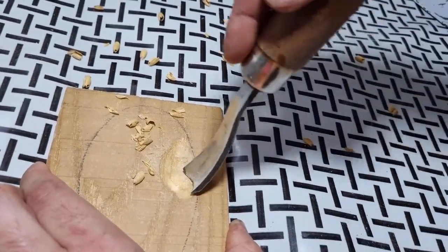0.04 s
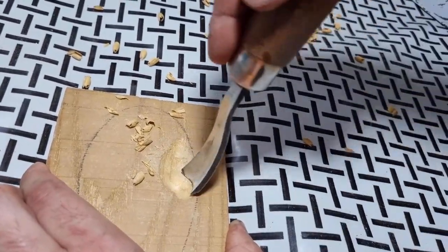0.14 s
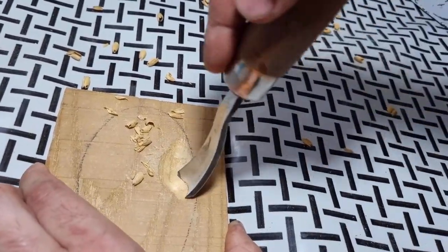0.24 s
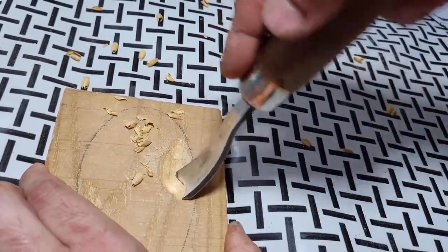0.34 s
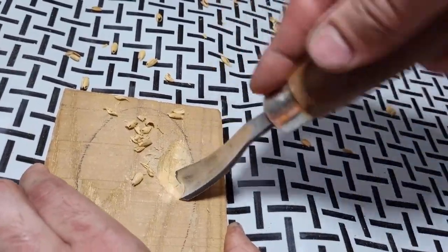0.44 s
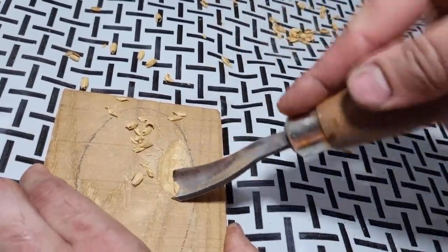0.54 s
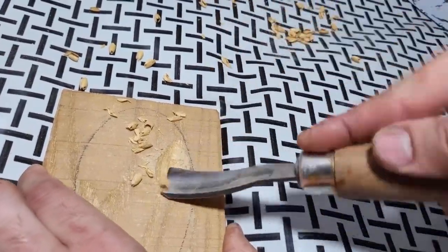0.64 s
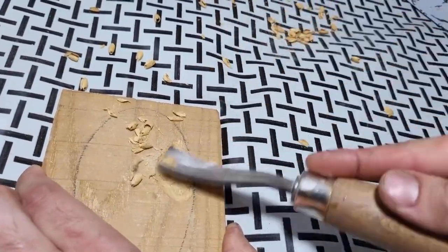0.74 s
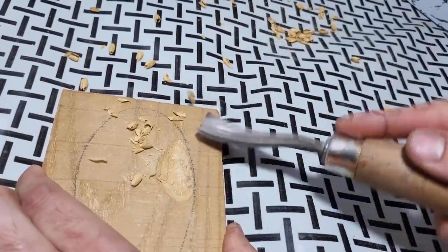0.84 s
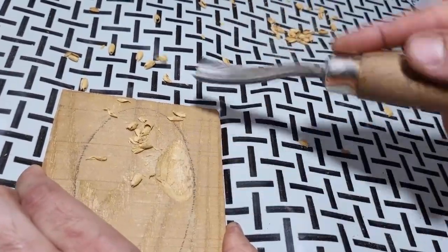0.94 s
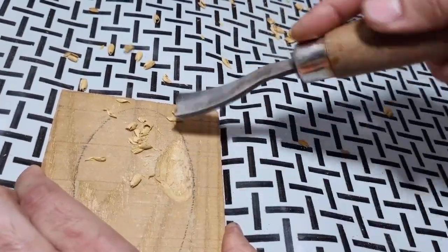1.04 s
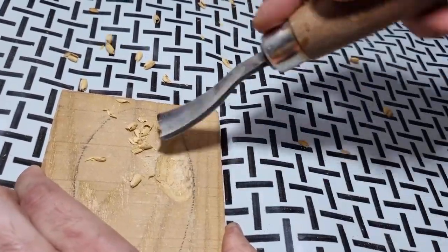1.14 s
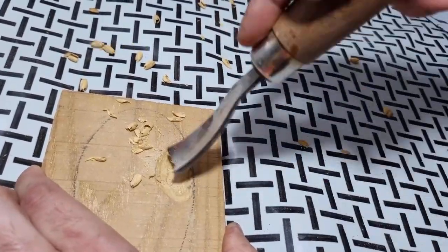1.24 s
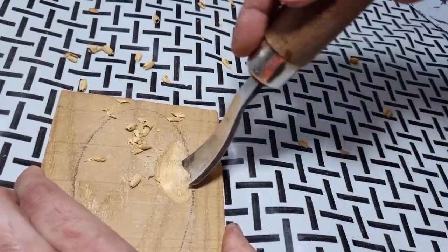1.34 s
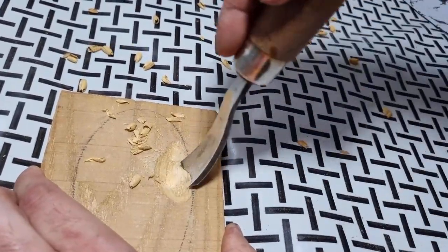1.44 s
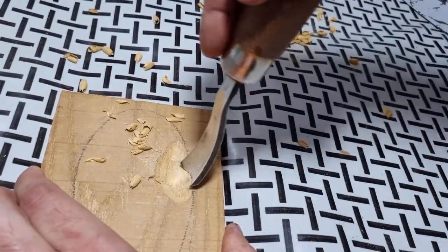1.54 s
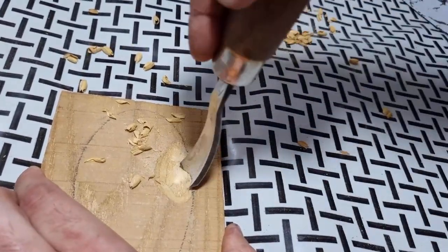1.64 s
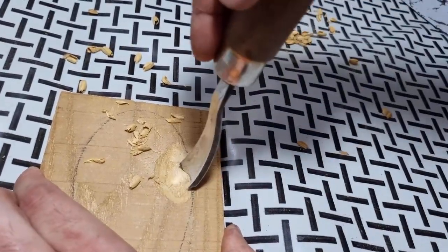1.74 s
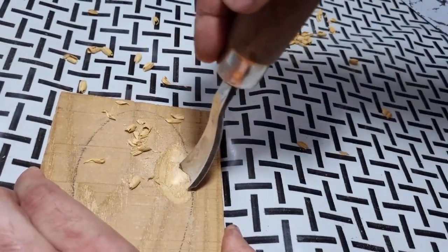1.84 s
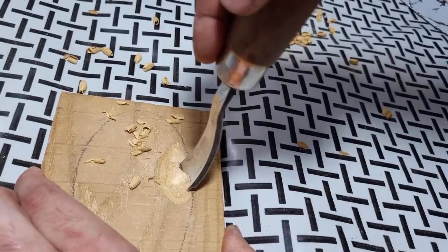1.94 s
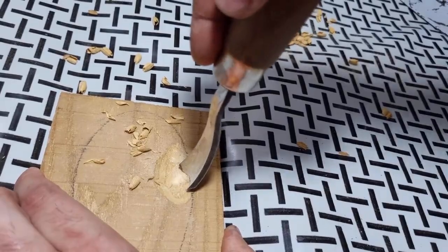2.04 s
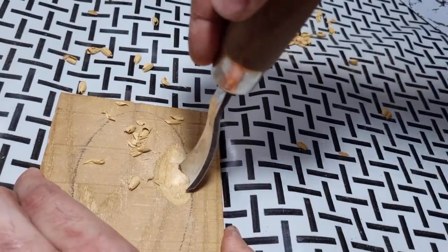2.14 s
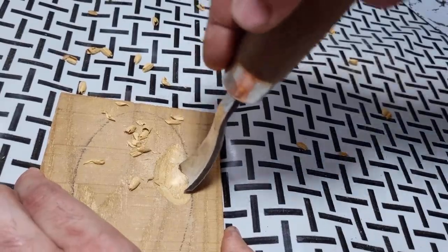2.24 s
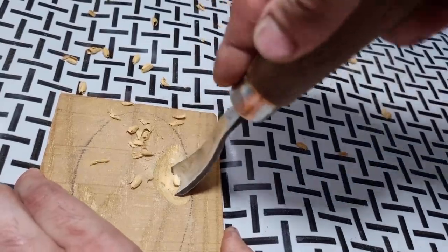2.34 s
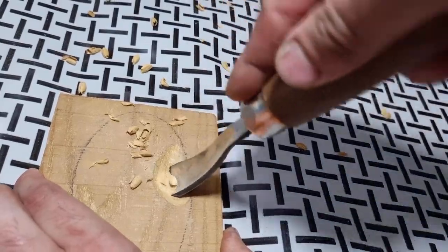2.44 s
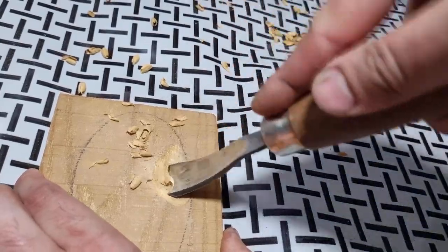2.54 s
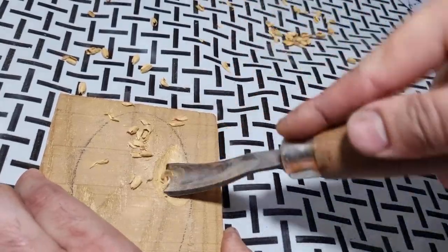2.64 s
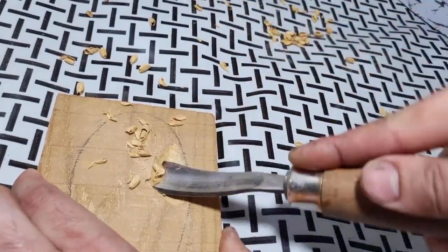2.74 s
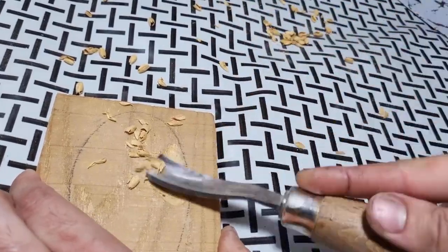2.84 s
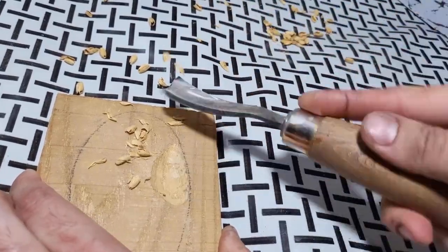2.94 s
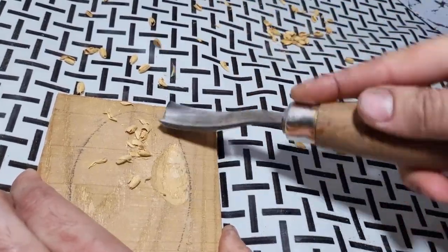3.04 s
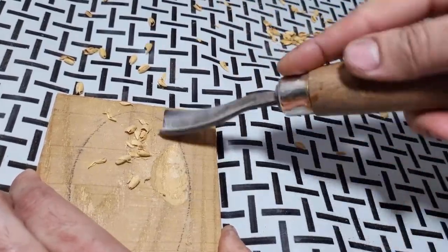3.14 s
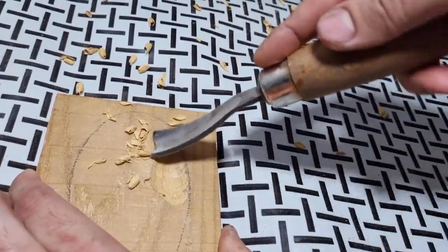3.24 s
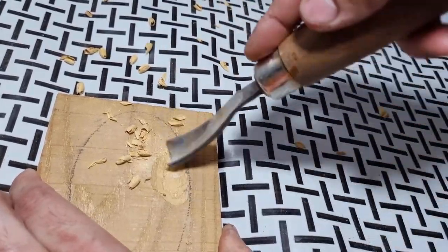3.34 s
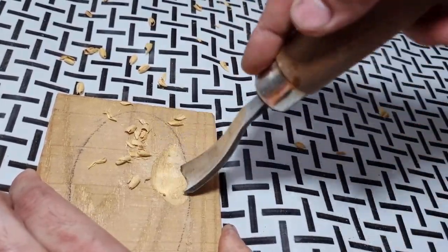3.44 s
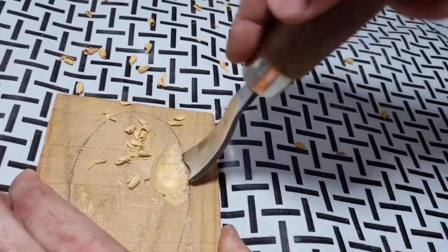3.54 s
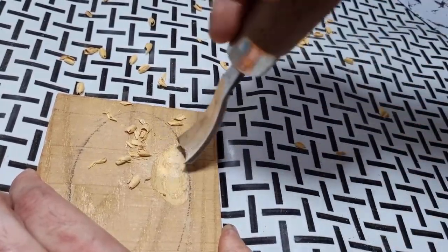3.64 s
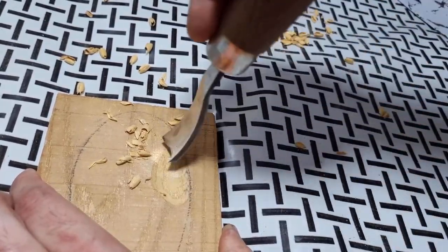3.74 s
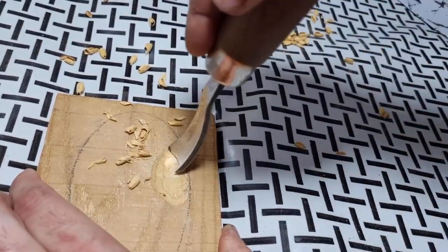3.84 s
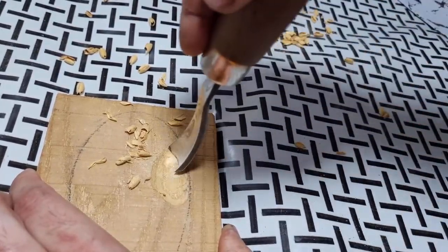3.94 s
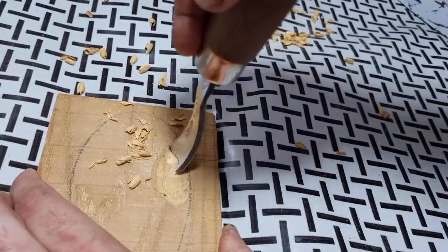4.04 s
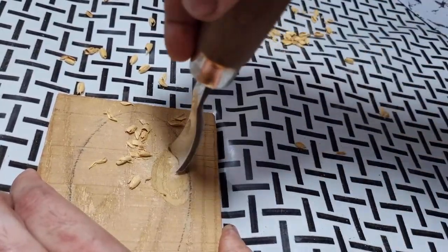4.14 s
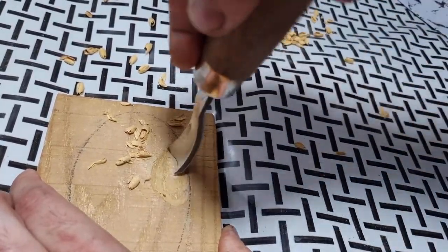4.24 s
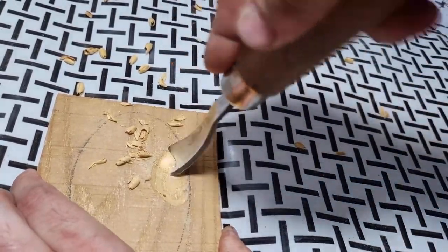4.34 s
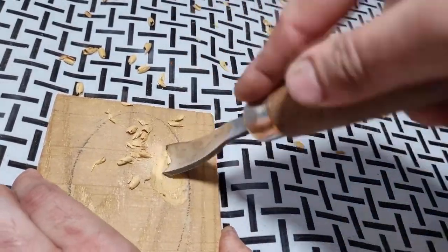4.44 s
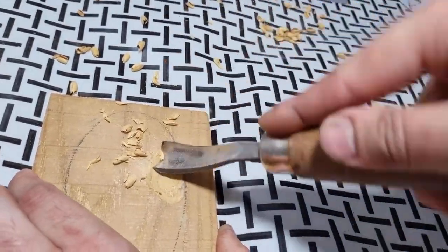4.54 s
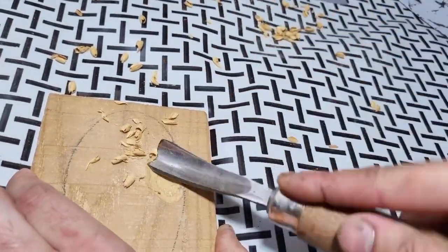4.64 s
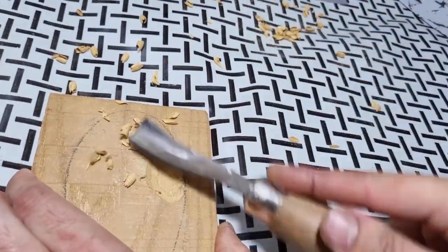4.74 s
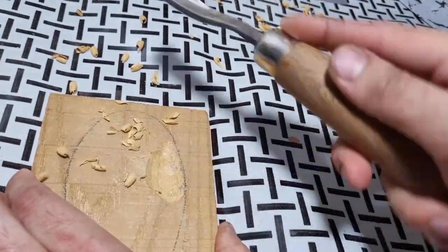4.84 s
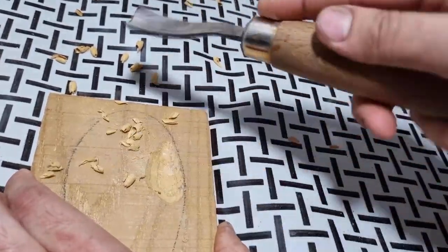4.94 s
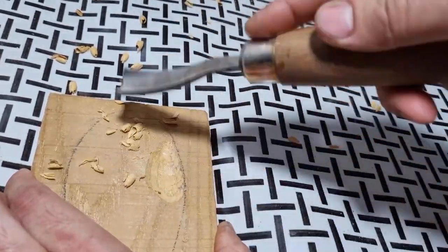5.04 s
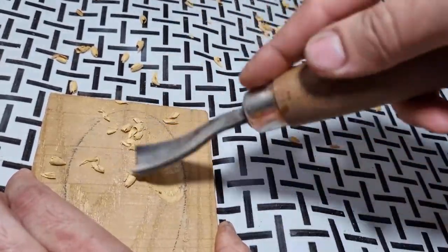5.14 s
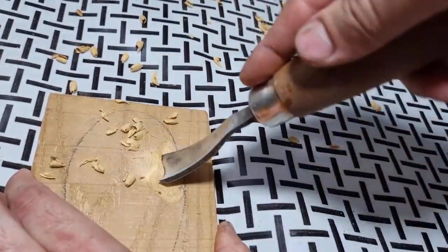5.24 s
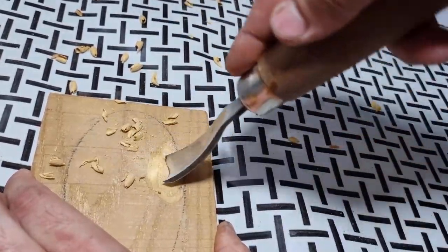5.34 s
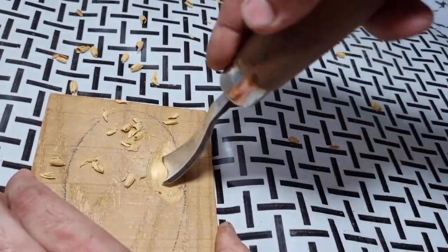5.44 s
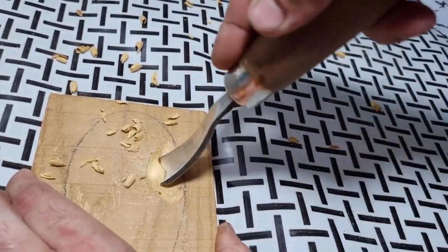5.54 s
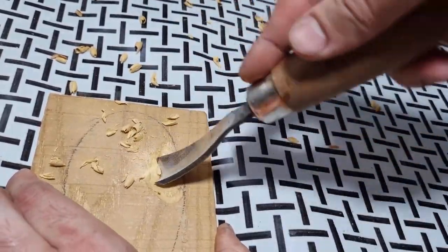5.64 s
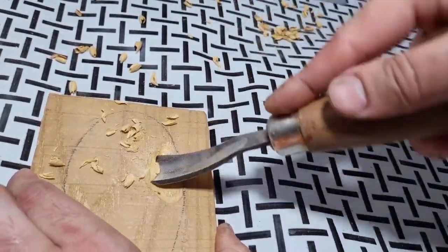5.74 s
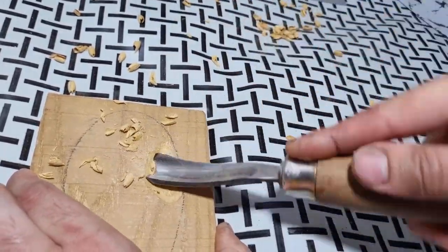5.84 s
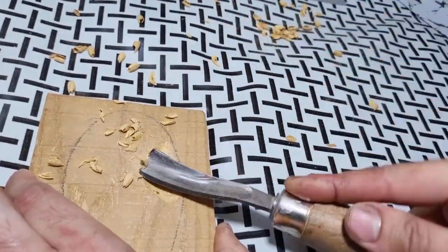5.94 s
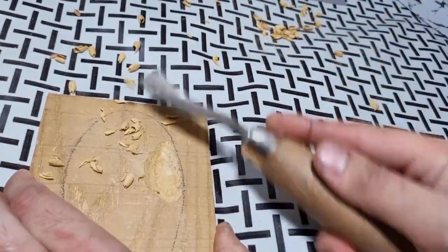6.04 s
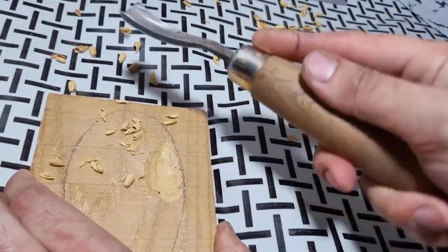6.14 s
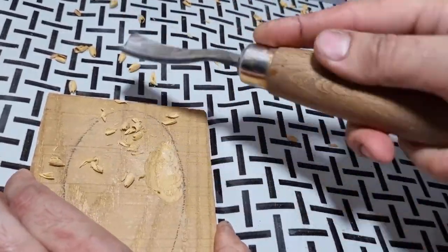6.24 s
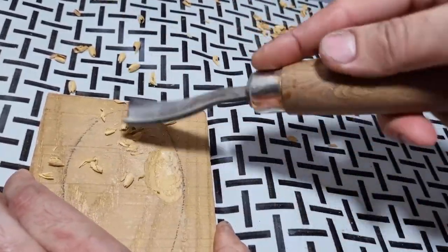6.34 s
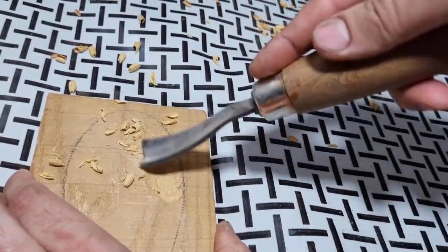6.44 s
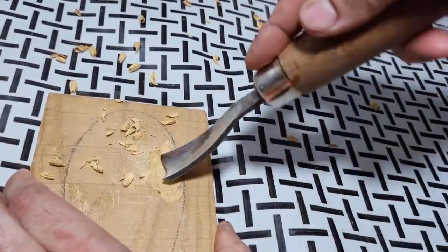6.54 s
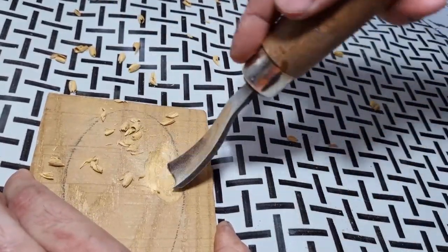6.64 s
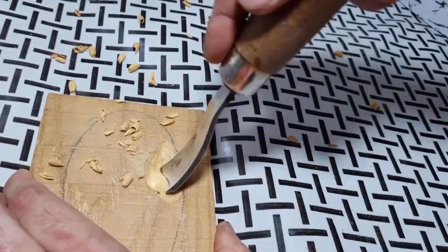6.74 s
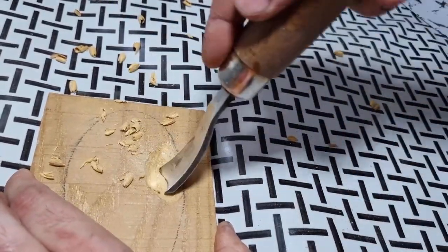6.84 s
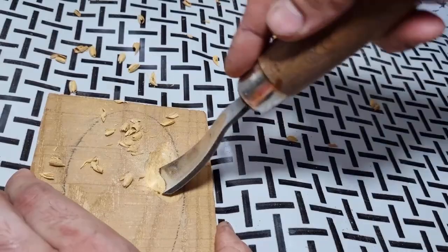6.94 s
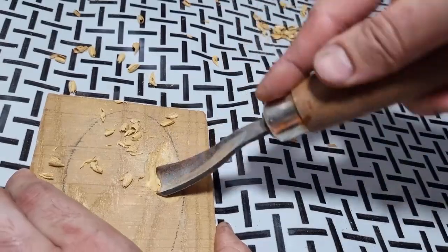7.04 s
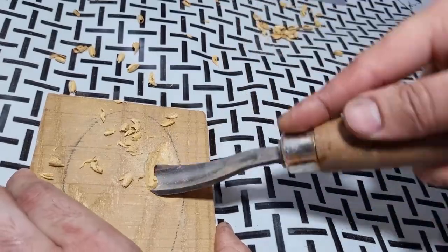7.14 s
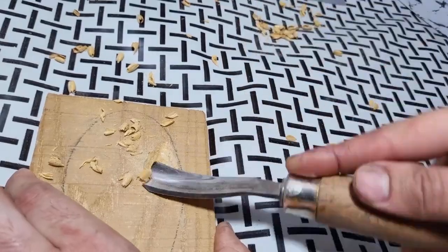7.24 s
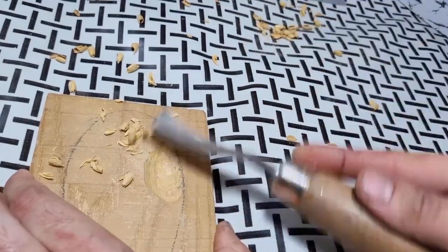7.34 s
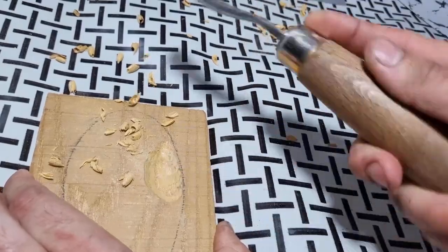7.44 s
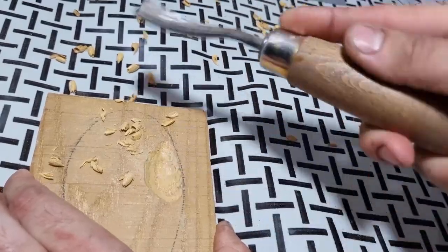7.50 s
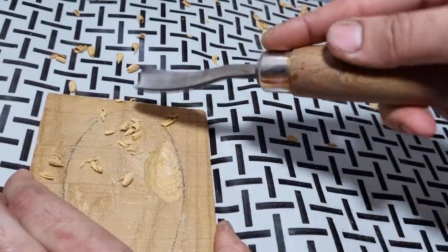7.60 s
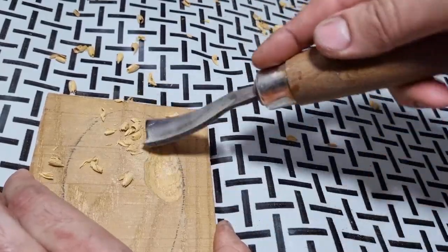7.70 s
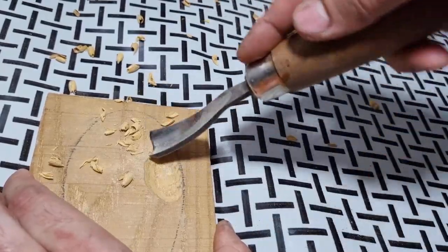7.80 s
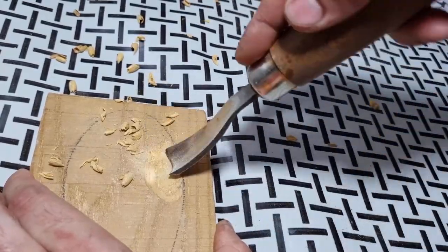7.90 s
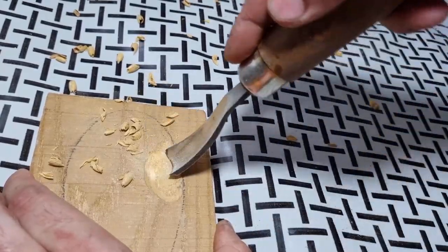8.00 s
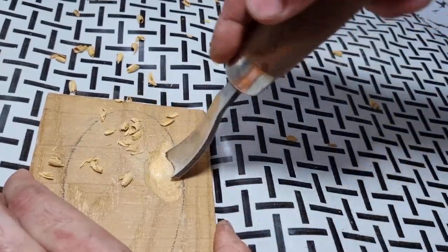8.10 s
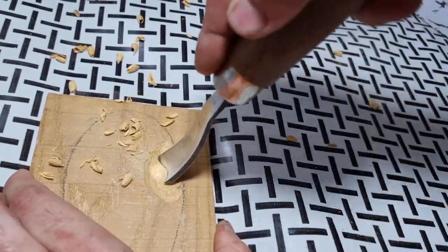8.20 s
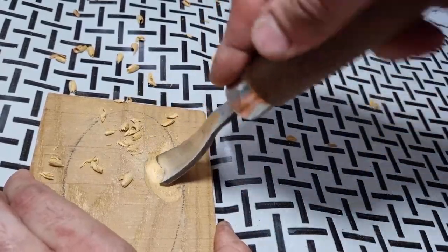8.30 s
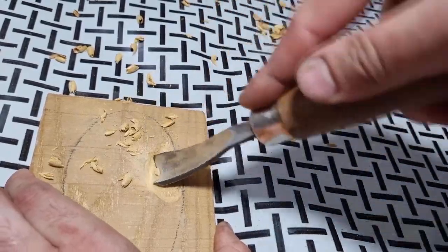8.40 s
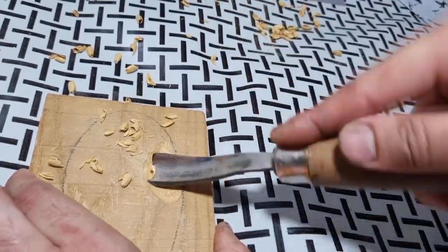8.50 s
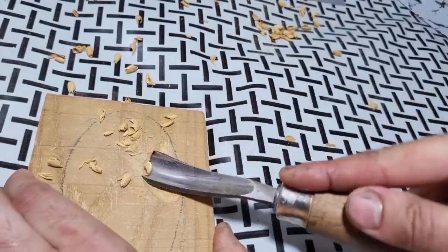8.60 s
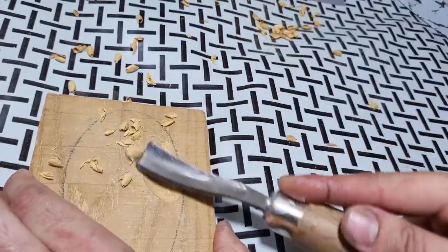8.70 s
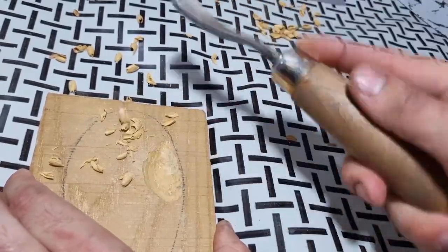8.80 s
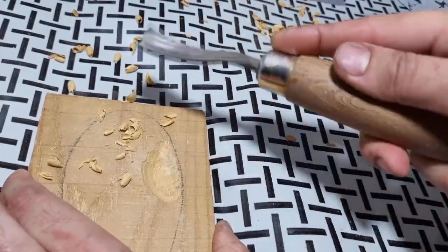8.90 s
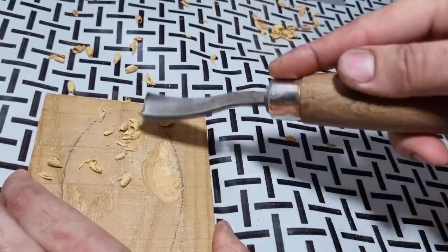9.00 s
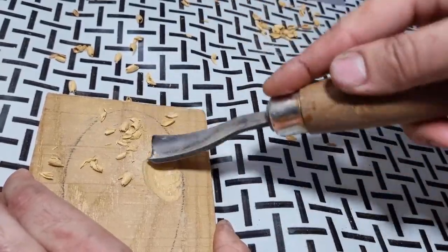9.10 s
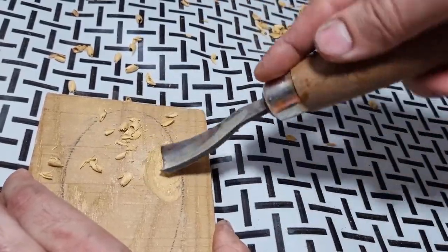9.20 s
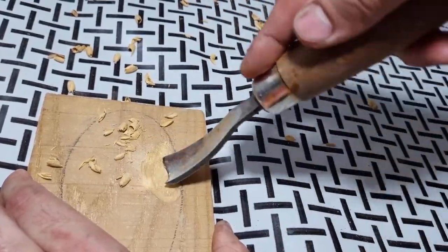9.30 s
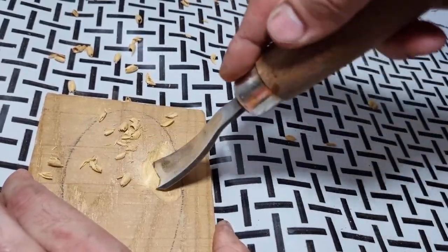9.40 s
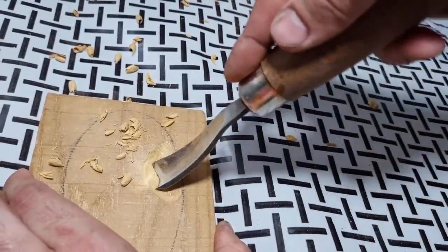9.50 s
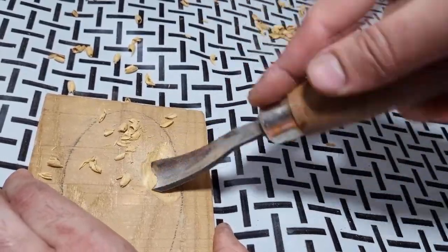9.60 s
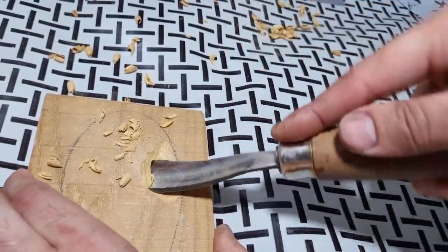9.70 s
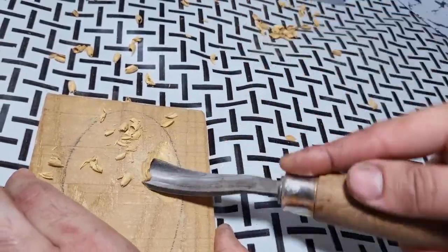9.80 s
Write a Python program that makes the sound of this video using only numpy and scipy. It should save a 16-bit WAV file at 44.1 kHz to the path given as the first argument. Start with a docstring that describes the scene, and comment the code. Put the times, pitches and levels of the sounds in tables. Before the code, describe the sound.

A hand gouge cuts a small wooden board in seven short, crackling strokes with light taps between, over a low hum.

```python
"""Close on a hand gouge hollowing a small board on a cloth-covered table, indoors, with a stereo pair.
From the start a low hum wavers under faint microphone hiss. The tail of a tap fades, then the edge bites:
fibres tear and snap in bursts, board and blade ring briefly, and the room answers. The chip lets go,
leaving the rustle of resting hands. Six more strokes follow, the edge tapped down ahead of each; the
last is still cutting as the sound ends, near ten seconds."""
import sys
import numpy as np
from scipy import signal
from scipy.io import wavfile

SR = 44100
rng = np.random.default_rng(int(sys.argv[2]) if len(sys.argv) > 2 else 0)


def dump_mix(stems):
    """Bounce the given channels to the path in sys.argv[1] as a 16-bit WAV at rate SR."""
    frames = np.atleast_2d(stems).T  # one column per channel
    limited = np.clip(frames, -1, 1)  # hard clip at full scale
    pcm = np.round(limited * 32767).astype(np.int16)
    wavfile.write(sys.argv[1], SR, pcm)


N = 434826

# Rumble and microphone hiss. Each row: frequency in Hz, relative spectral density in dB.
NOISE_SPECTRUM = [(25, -28), (40, -9), (52, -28.5), (95, -11.5), (118, -16.5), (200, -20.5), (270, -35.5),
                  (347, -31), (400, -44), (1000, -59), (2050, -49.5), (3000, -57), (6000, -47),
                  (9220, -59.5), (14700, -44.5), (16000, -55)]
# How alike that noise is at the two microphones. Each row: frequency in Hz, likeness from 0 to 1.
NOISE_LIKENESS = [(30, .86), (60, .9), (130, 1), (290, 0.64), (640, 0), (1400, 0), (15000, 0.3)]
# The low hum swells and fades. Each row: time in seconds, level in dB.
HUM_SWELLS = [(0.0, -49), (0.08, -43), (1.04, -44), (1.1, -39), (1.62, -48.5), (2.47, -37), (2.55, -45),
              (3.73, -52.5), (4.09, -39.5), (4.15, -49), (4.75, -48.5), (6.59, -44.5), (6.73, -52),
              (7.85, -42), (8.18, -48.5), (8.27, -38), (9.69, -51), (9.86, -38)]
# Narrow bands of hiss. Each row: centre in Hz, level in dB, t60 in seconds.
HISS_BANDS = [(2080, -73.5, 0.018), (6400, -64.5, .008)]
# The room around the table. Each row: low and high band edge in Hz, t60 in seconds, level in dB.
ROOM_BANDS = [(149, 607, 0.73, -11.5), (670, 2300, 0.38, -11), (1930, 6100, 0.36, -14),
              (4870, 13000, 0.22, -7.5)]

# Modes of the five ringing parts. Each row: frequency in Hz, gain in dB when tapped and when cutting,
# t60 in seconds, left microphone over right in dB, left lead in samples.
BOARD_BENDING = [(289.4, 0.5, -16, .025, 3, 2), (448, -4.5, -3.5, 0.017, -0.5, 3),
                 (605, -1.5, 1.5, 0.015, 0.5, 4), (700.5, 1, 2.5, 0.017, 0, 4),
                 (801, 3, -4, 0.018, -0.5, 4)]
BOARD_TWISTING = [(997, 1, -5, 0.012, 2, 4), (1173, -0.5, -3, 0.021, 1.8, 4), (1377, -8, -6.5, 0.025, 2, 4),
                  (1590, -12, -1, 0.024, 0.91, 7.5), (1772, -3, -1, 0.0095, 2.7, 7.4)]
BLADE_RING = [(2352, -16, -17, 0.034, 1.7, 13), (2531, 5, 0, 0.02, 2.1, 14.4),
              (2620, 2, -2, 0.024, 6.7, 15.42), (2760, -10, -8, 0.016, 6.3, 16.8),
              (3215, -26, -14.5, .015, 0.61, 14)]
CLINK_MODES = [(3540, -2, 5.5, 0.0023, 0.74, 2.5), (3900, -0.5, -7, 0.012, 0, 2),
               (4210, -7, -2, 0.0068, -1, -0.5), (4720, -3, -4.5, 0.011, -1.4, -5)]
CRACK_MODES = [(5285, 1, -1.5, .004, 2.5, 3), (5870, -1.5, -8, 0.0088, -2.2, 3.2),
               (6700, -18, -6, 0.0018, -1.5, 1), (7400, -7.5, -2.5, .004, -2, 4),
               (8340, -4, -7, 0.0026, -4.9, 7.5), (9050, -17, -6, 0.0023, -3.5, 2),
               (10400, -20.5, -5.5, 0.0023, -2, 5), (12430, -12, -6.5, 0.0025, 0.5, 3.5),
               (14700, -17, -5, .002, 0.5, 0.46)]

# The edge is set down. Each row: start in seconds, then bending, twisting, blade, clink and crack in dB.
EDGE_TAPS = [(0.8952, -20.5, -16, -29.5, -44.5, -45), (1.3965, -23, -9.5, -13.5, -12.5, -30.5),
             (3.2672, -27, -51, -65, -72, -51.5), (3.4594, -24, -14, -21, -21.5, -35),
             (3.9497, -18, -24.5, -34.5, -34, -40), (5.2636, -13.5, -7, -9, -11.5, -19.5),
             (5.3399, -18, -7.5, -4.5, -10, -32.5), (6.5573, -11, -6.5, -14.5, -22, -31.5),
             (6.6247, -20.5, -7.5, -6, -6, -20), (7.8519, -19.5, -44, -56, -64, -50),
             (7.9745, -18, -9, -16.5, -15.5, -27), (9.0812, -59, -39.5, -50, -45.5, -52),
             (9.1971, -15.5, -13, -35.5, -30.5, -33.5), (9.3038, -19, -5, -13.5, -12, -22.5)]
# The edge creeps in, then cuts; one list a stroke. Each row: time in seconds, push in dB, hiss in dB.
GOUGE_STROKES = [
    [(.2, -77, -67), (.29, -49.5, -60), (.53, -68, -54), (.55, -34, -52), (.65, -27.5, -41),
     (.742, -33.5, -39), (.79, -29, -40.5)],
    [(2.1, -74, -76.5), (2.35, -49, -62.5), (2.4, -35, -50), (2.47, -47, -56.5), (2.567, -36, -50),
     (2.63, -38, -47.5), (2.788, -35, -48.5), (2.844, -36, -50.5), (2.9, -34.5, -47.5), (2.955, -48, -50.5)],
    [(4.1, -68, -70), (4.3, -61.5, -56), (4.45, -42, -61), (4.503, -38, -45), (4.57, -40.5, -45),
     (4.661, -37.5, -44.5), (4.714, -33, -49.5), (4.767, -37, -33.5), (4.82, -41.5, -45.5)],
    [(5.5, -73, -69), (5.65, -46.5, -61), (5.71, -42, -52), (5.823, -46, -52), (5.879, -35.5, -47),
     (5.936, -39, -46.5), (5.992, -30, -39.5), (6.049, -48, -49), (6.105, -29.5, -63)],
    [(6.85, -56, -64), (7.06, -53, -68), (7.085, -28.5, -48.5), (7.198, -31.5, -49), (7.255, -25, -45),
     (7.312, -37, -52), (7.368, -35.5, -48.5), (7.425, -42, -52.5)],
    [(8.2, -65, -59.5), (8.3, -44, -71), (8.37, -55, -64), (8.41, -34, -51), (8.466, -28.5, -53),
     (8.55, -37, -44.5), (8.65, -37.5, -45.5), (8.744, -31.5, -36.5), (8.8, -42.5, -47.5)],
    [(9.45, -54, -61), (9.58, -53, -67), (9.65, -36, -57), (9.72, -47, -48), (9.78, -34, -46),
     (9.82, -35, -43), (9.86, -26, -45)],
]
# A faint tail dies away after a tap. Each row: start in seconds, then push, blade ring and hiss in dB.
TAP_TAILS = [(0.0, -43, -46.5, -56), (3.46, -45.5, -62, -63), (5.27, -34, -35, -55.5),
             (6.56, -45, -41, -67.5), (7.9, -46, -70, -62), (9.2, -62, -54, -64)]
# How fast a tail dies. One row: push, blade ring and hiss in dB per second.
TAIL_DECAY = [113.5, 77.5, 52]
# Loud fibres breaking. Each row: start in seconds, then bending, blade ring and crack in dB.
FIBRE_SNAPS = [(0.2532, -33, -43, -53), (0.305, -16.5, -19.5, -30), (0.3775, -11.5, -16.5, -27.5),
               (0.4405, -10, -12.5, -26), (0.4873, -11, -12.5, -25), (0.5436, -1, -16, -23.5),
               (0.5629, -9, -16, -20), (0.5705, -9.5, -26, -25), (0.5832, -11, -17, -24),
               (0.5956, -32, -24, -34), (0.6236, -7, -18, -25), (0.6531, -7.5, -19, -26),
               (0.6715, -11.5, -16.5, -24), (0.6945, -10, -22, -24), (0.7156, -8, -23, -37),
               (0.7235, -9.5, -17, -41), (0.7442, -9, -10, -34), (0.7512, -14, -27, -37),
               (0.7631, -13, -15, -39), (0.7741, -14, -11, -24.5), (2.3134, -27.5, -39, -42),
               (2.3439, -33, -56, -51), (2.3635, -12, -30, -31), (2.368, -10, -15, -23),
               (2.3737, -4, -4.5, -19), (2.3874, -17, -38, -39), (2.5079, -34, -29, -42),
               (2.5417, -4.5, -13.5, -24.5), (2.5722, -10, -15, -22), (2.6224, -17, -24, -27),
               (2.633, -19, -23.5, -25), (2.659, -13, -21, -28), (2.6734, -19, -13.5, -27),
               (2.697, -9.5, -23, -28.5), (2.711, -24, -25, -25), (2.7291, -29, -33, -34),
               (2.7455, -36, -26, -31), (2.7817, -15, -29, -33), (2.7896, -15, -27, -42),
               (2.799, -17, -26, -42), (2.8904, -22, -24, -55), (2.9497, -25, -46, -39),
               (3.4268, -23.5, -65, -56), (3.443, -20, -46, -47.5), (4.3926, -22, -31.5, -42.5),
               (4.4207, -14.5, -23.5, -29.5), (4.4596, -1.5, -18, -26), (4.4772, -2, -29, -21.5),
               (4.4946, -22, -16, -33), (4.5089, -42, -24, -26), (4.5299, -21, -27, -48),
               (4.544, -29, -36, -25.5), (4.5724, -26, -24, -28), (4.7021, -23, -21, -28),
               (4.7533, -22, -43, -21.5), (4.7644, -14, -13.5, -32), (4.7876, -18, -29, -25),
               (5.5172, -23, -37, -59), (5.5569, -7.5, -21.5, -32.5), (5.6092, -3.5, -23.5, -35),
               (5.677, -6.5, -16.5, -40), (5.7387, -29, -22.5, -35), (5.798, -18.5, -30, -31),
               (5.8138, -16, -13, -21.5), (5.8546, -28, -24, -24), (5.8735, -30, -28, -29),
               (5.8927, -30, -23, -27), (5.9514, -32, -24, -33), (5.9922, -16, -29, -24),
               (6.0172, -21, -19, -27), (6.0302, -20.5, -20.5, -22), (6.0949, -23.5, -30, -36.5),
               (6.8241, -15.5, -40.5, -55.5), (6.9848, -32.5, -45, -61), (7.0372, -32, -36, -55),
               (7.0554, -27.5, -41, -49), (7.0741, -21, -24, -43), (7.0927, -24, -15, -39),
               (7.1165, -18, -23, -35), (7.1429, -27, -30, -44), (7.1735, -18, -21, -38),
               (7.1877, -6.5, -17, -29), (7.2044, -23, -22, -33), (7.2295, -20, -28, -34),
               (7.2417, -16.5, -35, -36), (7.2595, -13.5, -15, -33), (7.3351, -26, -27, -48),
               (7.9449, -26.5, -51.5, -48), (8.2701, -10, -28.5, -38.5), (8.3168, -28, -38, -47),
               (8.3518, -23.5, -33, -44), (8.3892, -14.5, -20, -43), (8.4105, -5, -11, -31.5),
               (8.4146, -3, -7.5, -26), (8.444, -8.5, -12, -33), (8.4543, -16, -8.5, -31),
               (8.4705, -22, -23, -31), (8.4876, -13, -19, -31), (8.4986, -6, -10, -29),
               (8.5125, -27, -20, -25), (8.5556, -27, -23.5, -33), (8.5759, -27, -16.5, -30),
               (8.5829, -13, -16, -20), (8.6041, -13, -13.5, -23), (8.7091, -23, -23, -24),
               (8.7335, -21, -24, -28), (8.7429, -28, -33, -33), (8.7602, -19.5, -31.5, -40.5),
               (9.2917, -13.5, -36.5, -40), (9.4846, -18, -30, -41), (9.5691, -24.5, -37, -50),
               (9.6698, -20.5, -28, -36.5), (9.7002, -14.5, -18, -28), (9.7267, -18, -26.5, -29),
               (9.7711, -17.5, -26.5, -29.5), (9.8236, -15.5, -30, -31), (9.8419, -11, -18.5, -30),
               (9.8535, -12, -28, -39)]

BACKGROUND_DB, HUM_HZ, HUM_WANDER_HZ = -48, 72.3, 3.5
EXIT_S, EXIT_DB = 0.016, [-63, -64]  # the chip lets go: push and hiss drop at once
SETTLE_S, REST_DB = 0.067, [-75, -71.5]  # then fade to the rustle of the resting hands
SMALL_SNAP_DB, SMALL_SPREAD_DB = [8, 8.5, 5.5], 4  # over the cut's push, blade ring and hiss
GRIP_DB, CUTOFF_HZ = 1.4, 16650


def from_db(db):
    """Decibels to gain."""
    return 10 ** (np.asarray(db) / 20)


def rms_one(x):
    """Scale to rms 1."""
    return x / np.sqrt(np.mean(x ** 2) + 1e-20)


def butter(x, hz, kind):
    """Gentle low-cut or band filter."""
    return signal.sosfilt(signal.butter(2, hz, kind, fs=SR, output="sos"), x)


def in_time(rows):
    """Columns of a curve table, one value per sample."""
    times, *columns = np.transpose(rows)
    return [np.interp(np.arange(N) / SR, times, column) for column in columns]


def at_hz(points, hz):
    """Read a table on a log-frequency axis."""
    freqs, values = np.transpose(points)
    return np.interp(np.log(hz), np.log(freqs), values)


def drift(rate_hz):
    """Slow random wander with spread 1."""
    r = np.exp(-40 * np.pi * rate_hz / SR)
    slow = signal.lfilter([1], [1, -2 * r, r * r], rng.standard_normal(N // 20 + 2002))[2000:]
    return np.interp(np.arange(N) / 20, np.arange(len(slow)), rms_one(slow))


def ring(clicks, hz, t60):
    """One damped mode: a unit click sets a sine of height 1 ringing."""
    r, w = from_db(-60 / (t60 * SR)), 2 * np.pi * hz / SR
    return signal.lfilter([0, np.sin(w)], [1, -2 * r * np.cos(w), r * r], clicks + 1e-18)


def background():
    """Rumble and hiss in third octaves: the microphones agree in the bass, hardly in the treble."""
    out, edges = 0, 24 * 2 ** np.arange(0, 9.5, 1 / 3)
    white = rng.standard_normal((2, 2, N))
    for k, (low, high) in enumerate(zip(edges, edges[1:])):
        mid, side = butter(white[k % 2], [low, high], "band")
        hz = np.sqrt(low * high)
        alike = at_hz(NOISE_LIKENESS, hz)
        pair = np.sqrt(1 + alike) * mid + np.sqrt(1 - alike) * side * [[1], [-1]]
        out = out + from_db(at_hz(NOISE_SPECTRUM, hz)) * pair
    return from_db(BACKGROUND_DB) * rms_one(out)


def hum():
    """A low tone a little to the left, wandering in pitch and level, and two faint bands of hiss."""
    pitch_hz = HUM_HZ + HUM_WANDER_HZ * drift(5)
    level_db = in_time(HUM_SWELLS)[0] + 2.1 * drift(3) + 2.9 * drift(18)
    tone = np.sqrt(2) * np.sin(2 * np.pi * np.cumsum(pitch_hz) / SR) * from_db(level_db)
    hiss = sum(from_db(db) * rms_one(ring(rng.standard_normal((2, N)), hz, t60))
               for hz, db, t60 in HISS_BANDS)
    return tone * from_db([[1.1], [-1.1]]) + hiss


def room(direct):
    """The walls answer 6 ms behind the direct sound; diffuse echoes die band by band."""
    t = np.arange(int(.7 * SR)) / SR
    tail = 0
    for low_hz, high_hz, t60, level_db in ROOM_BANDS:
        noise = butter(rng.standard_normal((2, len(t))), [low_hz, high_hz], "band")
        tail = tail + from_db(level_db - 60 * t / t60) * noise * np.sqrt(14 / t60 / SR)
    tail = tail * np.clip((t - .006) / 0.0009, 0, 1)
    tail = tail + .5 * tail[::-1]  # closely spaced microphones share part of the echoes
    return signal.fftconvolve(direct.mean(0, keepdims=True), tail, axes=1)[:, :N]


def cutting_levels():
    """Push on the board, blade ring and tearing hiss in dB: strokes, rests and the tails of taps."""
    rows = []
    for stroke in GOUGE_STROKES:
        start, end = stroke[0][0], stroke[-1][0]
        rows += [(start - SETTLE_S / 2, *REST_DB), *stroke]
        rows += [(end + EXIT_S, *EXIT_DB), (end + SETTLE_S, *REST_DB)]
    push_db, hiss_db = in_time(sorted(rows))
    blade_db = 0.72 * push_db + 0.56 * hiss_db + 11
    levels = np.array([push_db, blade_db, hiss_db])
    for start, *start_db in TAP_TAILS:
        since = np.arange(N) / SR - start
        tail_db = np.c_[start_db] - np.c_[TAIL_DECAY] * since
        levels = np.maximum(levels, np.where(since >= 0, tail_db, -120))
    return levels


def tearing(push_db, blade_db, hiss_db):
    """Fine fibres break by the thousand, in random clumps; each break shakes all five parts."""
    breaks_per_s = 4000 * from_db(5 * drift(40))
    at = np.flatnonzero(rng.random(N) < breaks_per_s / SR)
    sizes = from_db(1.82 * np.minimum(rng.exponential(1, len(at)), 5)) * rng.choice([-1, 1], len(at))
    twist_db = 0.5 * push_db + 0.48 * blade_db - 16  # follows both the push and the blade's chatter
    clink_db = 0.36 * blade_db + 0.54 * hiss_db - 20.5
    parts_db = np.array([push_db - 12, twist_db, blade_db - 15.5, clink_db, hiss_db - 7.5])
    return at, sizes * from_db(parts_db[:, at])


def snapping(levels):
    """Loud fibre snaps plus about fifty small ones a second that follow the cut; rows as in EDGE_TAPS."""
    at, spread = rng.integers(0, N, 500), rng.uniform(-1.7, 1.7, (500, 3))
    small = np.c_[at / SR, levels[:, at].T + SMALL_SNAP_DB + SMALL_SPREAD_DB * spread]
    start, bend_db, blade_db, crack_db = np.r_[FIBRE_SNAPS, small].T
    twist_db = .2 * bend_db + 0.39 * blade_db + .6 * crack_db + 3
    clink_db = 0.37 * blade_db + 0.87 * crack_db - 5.5
    return np.c_[start, bend_db, twist_db, blade_db, clink_db, crack_db]


def blows(rows, spread_s, after_db, count):
    """Weaker contacts trail each blow within milliseconds; gives sample indices and strengths per part."""
    rows = np.array(rows)
    wait = np.c_[np.zeros(len(rows)), rng.random((len(rows), count))]
    at = np.round((rows[:, :1] + spread_s * wait) * SR).astype(int).ravel()
    signs = (-1) ** np.arange(count + 1)
    strengths = [from_db(level_db[:, None] + (wait > 0) * (step_db - 3.4 * wait)) * signs
                 for level_db, step_db in zip(rows.T[1:], after_db)]
    return np.minimum(at, N - 1), np.reshape(strengths, (len(after_db), -1))


def carving():
    """Taps, snaps and tears ring board and blade; each mode reaches the two microphones its own way."""
    tap_at, taps = blows(EDGE_TAPS, spread_s=.005, after_db=[-7.5, -14, -7, -5, -1], count=4)
    levels = cutting_levels()
    snap_at, snaps = blows(snapping(levels), spread_s=.004, after_db=[-14.5, -5.5, -12, 0, 0], count=5)
    tear_at, tears = tearing(*levels)
    taps *= from_db([[-3], [-3], [-3], [-3], [-1]])
    snaps *= from_db([[-1], [-3], [-3], [-6], [-5]])
    at, strengths = np.r_[tap_at, snap_at, tear_at], np.c_[taps, snaps, tears]
    tapped = np.arange(len(at)) < len(tap_at)
    scatter = np.where(tapped, .6, 1)  # taps land more alike than snaps
    parts = [BOARD_BENDING, BOARD_TWISTING, BLADE_RING, CLINK_MODES, CRACK_MODES]
    out = np.zeros((2, N))
    for modes, strength, unlike_db in zip(parts, strengths, [2, 3.5, 1.5, 7.2, 4.1]):
        for k, (hz, tap_db, cut_db, t60, pan_db, lead) in enumerate(modes):
            shared, sideways = rng.standard_normal((2, len(at))) * scatter
            # the colour shifts as grip and angle change
            grip = np.interp(at / SR * 6, np.arange(61), rng.standard_normal(61))
            level_db = np.where(tapped, tap_db, cut_db + GRIP_DB * grip) + 2 * shared
            side_db = pan_db / 2 + unlike_db * sideways
            left_at = np.clip(at - round(lead), 0, N - 1)
            left = np.bincount(left_at, strength * from_db(level_db + side_db), N)
            right = np.bincount(at, strength * from_db(level_db - side_db), N)
            out += ring(np.array([left, right]), hz, t60) * (-1) ** k
    return butter(out, 170, "high")  # a small board radiates no bass


def scene():
    """Gouge and board close to the microphones; echoes, rumble, hiss and hum behind them."""
    near = carving()
    return near + room(near) + background() + hum()


def record(dry):
    """The recorder rounds the peaks, loses the deepest bass and cuts the top."""
    rounded = 1.358 * np.tanh(dry / 1.213)
    thin = butter(rounded, 38, "high")
    return signal.sosfilt(signal.cheby2(12, 70, CUTOFF_HZ, fs=SR, output="sos"), thin)


dry = scene()
out = record(dry)
dump_mix(out)
```